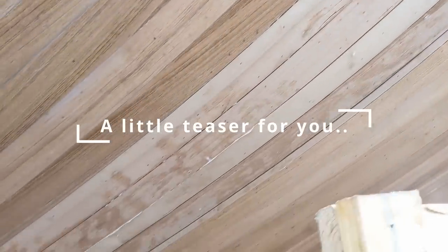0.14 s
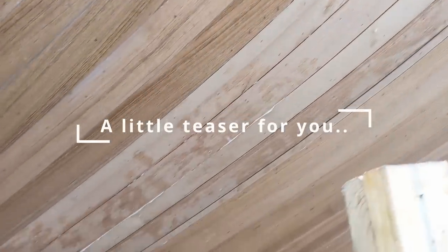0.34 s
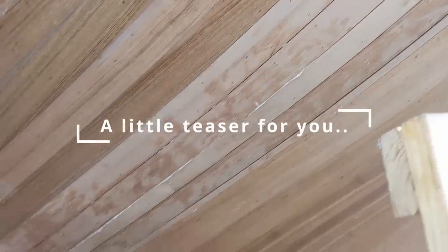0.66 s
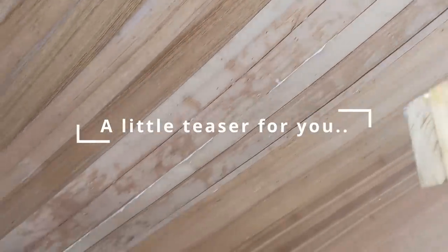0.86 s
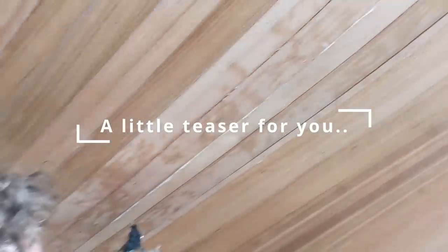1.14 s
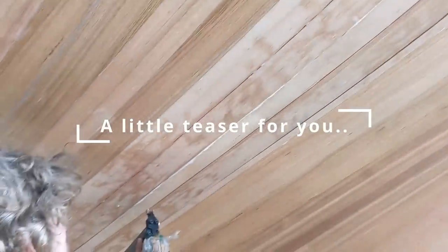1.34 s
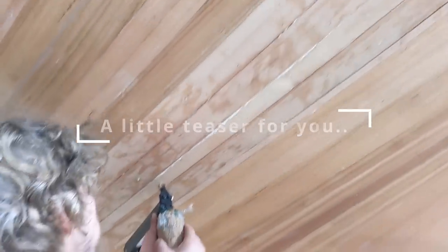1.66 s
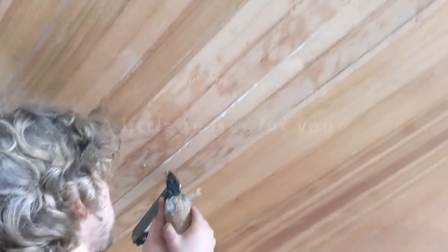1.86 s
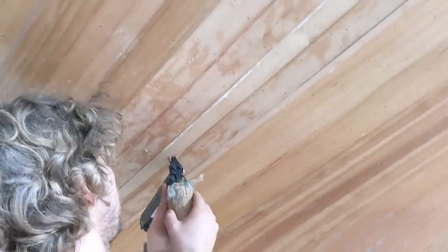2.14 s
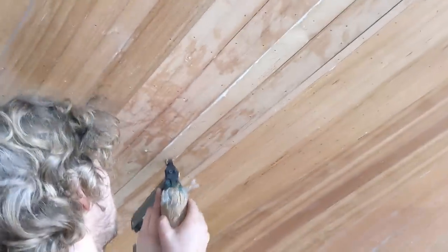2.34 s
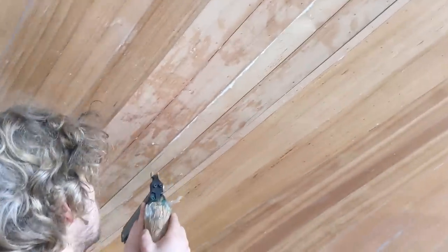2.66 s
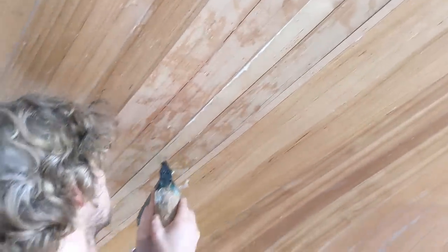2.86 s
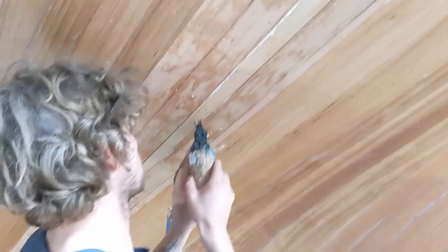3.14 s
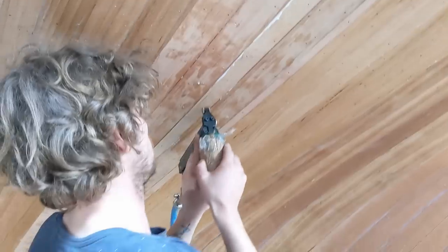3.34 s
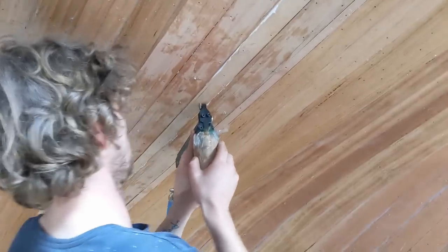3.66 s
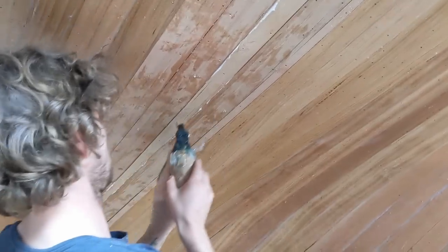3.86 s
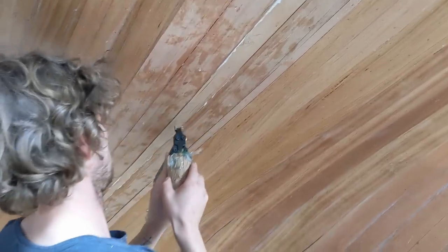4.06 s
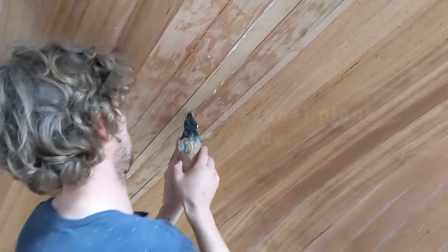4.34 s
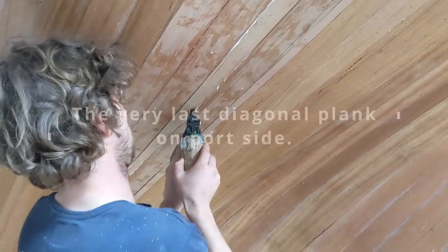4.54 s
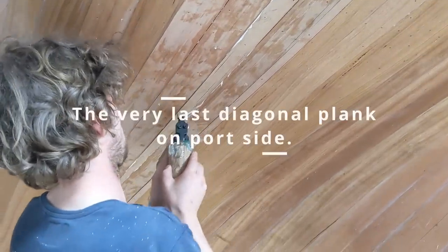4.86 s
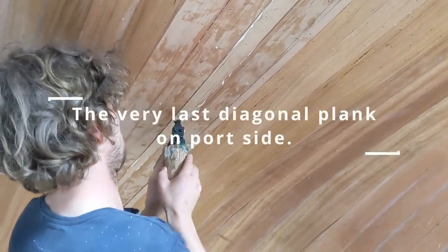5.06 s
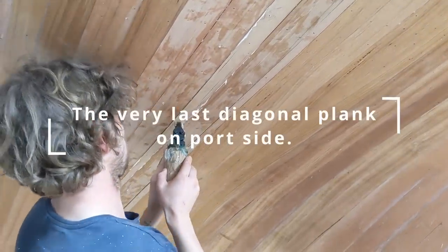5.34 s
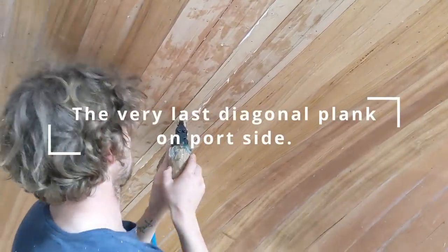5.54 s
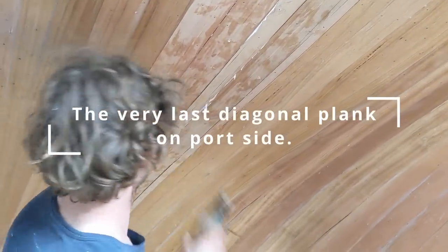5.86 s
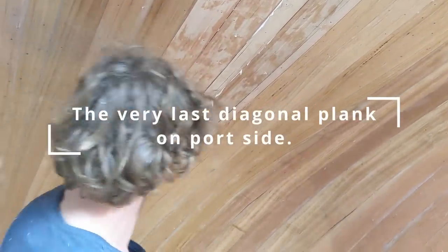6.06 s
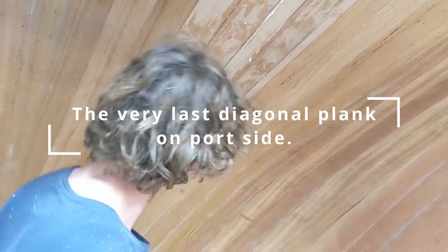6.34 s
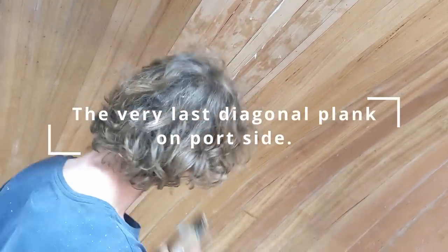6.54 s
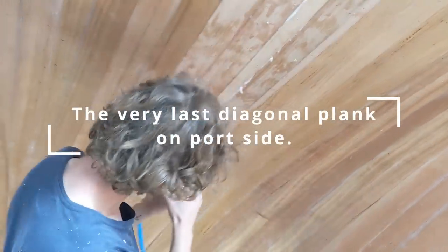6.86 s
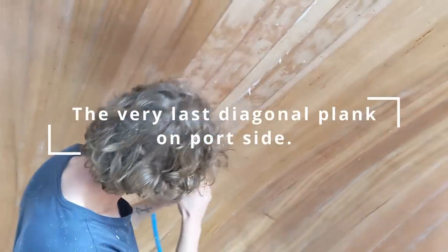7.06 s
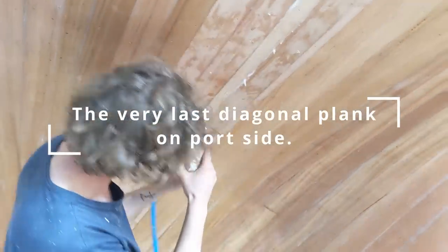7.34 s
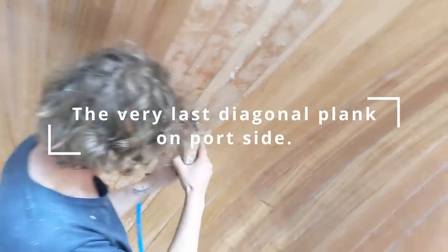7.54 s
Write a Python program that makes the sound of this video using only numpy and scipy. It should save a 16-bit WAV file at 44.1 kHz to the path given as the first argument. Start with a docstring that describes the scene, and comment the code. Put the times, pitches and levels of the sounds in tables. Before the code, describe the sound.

In a quietly humming workshop, small metal clicks, cloth rustle, a sliding hose and gritty shoe scuffs come first. Then a pneumatic nail gun thumps onto hull planks and fires, booming hollowly and venting air. Four more spaced shots follow, with clicks and nose taps between, and a scuffing step before the last. Close stereo microphones; the loud peaks are squashed and the quiet sounds recover after each shot.

```python
"""In a humming workshop, steel parts click, hose and clothes shuffle, gritty shoes scuff and a sole squeaks.
A pneumatic nail gun's nose lands on a planked wooden hull, its trigger clicks, and it fires: five shots in all.
Each shot is a driver blow, a recoil clatter and the boom of the hull; then the piston knocks home and air exhausts.
Blows ring decaying modes; air and friction are coloured noise under envelopes. A footfall rumbles before the last shot."""
import sys
import numpy as np
from scipy import signal
from scipy.fft import rfft, irfft, next_fast_len
from scipy.io import wavfile
from scipy.ndimage import uniform_filter1d, minimum_filter1d

SR = 44100
rng = np.random.default_rng(int(sys.argv[2]) if len(sys.argv) > 2 else 0)


def wav_out(sig):
    """Save sig, one row per channel (or a flat mono array), as 16-bit PCM at SR to the path in sys.argv[1]."""
    wavfile.write(sys.argv[1], SR, np.round(np.clip(np.atleast_2d(sig).T, -1, 1) * 32767).astype(np.int16))


N = 339129
TIME = np.arange(N) / SR

# Table levels are relative unless marked rms; the functions trim them.
# shots: (time [s], blow [dB], recoil [dB], hull boom [dB], hollow ring [dB])
SHOTS = [(2.2225, -2.5, -5.5, 2, -1), (3.5782, -3.5, 1, 2, 7), (4.5017, -6, 9.5, 2.5, 4.5),
         (5.4938, -1, 7.5, 2.5, 10), (7.5100, -4.5, 5.5, 3, 2)]
# trigger releases that vent the cylinder: (time [s], level [dB], length [share of usual], low puff [dB])
VENTS = [(2.3611, 1.5, 0.99, 0), (3.7329, 1.5, 0.93, -1.5), (4.6679, 2, 0.89, -3.5),
         (5.6395, 1.5, 0.95, -7), (7.6588, -1.5, 0.46, -6.5)]
# piston knocking home just before the vent opens: (time [s], knock [dB], first touch [dB])
KNOCKS = [(2.356, -15, -4), (3.715, -7, -14), (4.651, 6.5, 9.5), (5.629, -1, 2.5), (7.645, 6, -27)]
# trigger and safety catch: (time [s], steel ring [dB], woody tap [dB], bright snap [dB])
CLICKS = [(0.034, -34, -69, -47), (1.17, -48, -48, -45), (1.363, -57, -51.5, -48), (1.706, -48, -43, -44),
          (2.067, -50, -71, -58), (2.186, -37, -45, -39), (3.248, -26, -34.5, -27), (3.365, -52, -72, -44),
          (3.442, -34, -69, -33), (3.475, -41, -68, -41), (4.239, -28, -31, -29), (4.417, -45, -52, -41),
          (4.475, -40, -41, -46), (5.301, -28.5, -44, -33), (5.355, -44.5, -70, -42),
          (6.558, -35, -43, -42), (6.897, -35, -41, -41), (6.923, -37, -36.5, -40),
          (7.262, -37, -43.5, -32.5)]
# nose landing on the hull: (time [s], thump [dB], contact low-pass [Hz], steel tip [dB], woody tap [dB],
# bright snap [dB], bounce re first touch [dB])
BUMPS = [(1.841, 5, 556, -32.5, -35, -33.5, 2.5), (3.288, -5, 225, -37.5, -37.5, -36, -7),
         (4.298, -16, 198, -47, -38, -51, -6), (5.4, -5, 173, -33, -32, -37, -6.5),
         (6.38, -46, 303, -50, -46, -54, -8), (7.391, -15, 109, -33.5, -32.5, -30, -3)]
# hull panel modes: (frequency [Hz], level [dB], t60 [s])
HULL_MODES = [(65.3, -19, 1), (88, -4.5, 0.38), (122.9, -2, 0.34), (180.3, -3.5, 0.24), (200, -8, 0.22),
              (222.6, 2, 0.18), (264, -0.5, 0.12), (342, -3.5, 0.083), (410, -1.5, 0.12), (484, -9.5, 0.14),
              (501, -22, 0.18), (648, -14.5, 0.2)]
# plank right under the nose: (frequency [Hz], level [dB], t60 [s])
PLANK_MODES = [(318, -8, 0.014), (670, 1, 0.0074), (1235, -9.5, 0.036), (1570, -6, 0.0076),
               (2510, -17, 0.025)]
# gun steel at size 1, before hand damping: (frequency [Hz], level [dB], t60 [s])
GUN_MODES = [(2364, 10, 0.036), (3500, 9, 0.004), (4300, 5, 0.012), (6200, 6.5, 0.0029),
             (9980, -3.5, 0.014)]
# what the piston sets ringing: (frequency [Hz], level [dB], t60 [s])
PISTON_MODES = [(256, -6.5, 0.048), (380, -1, 0.029), (503, -2.5, 0.0082), (1540, -11.5, 0.033)]
# staging boards under gritty soles: (frequency [Hz], level [dB], t60 [s])
BOARD_MODES = [(338, -3.5, 0.031), (532, -2.5, 0.015), (700, -8, .04), (1053, -1, .025), (1250, 1, 0.022),
               (1770, -3.5, 0.017), (2310, -0.5, 0.019), (2600, -5, 0.012)]
# shoe scuffs: (time [s], level [dB], half length [s])
SCUFFS = [(0.42, -49, 0.019), (0.475, -43.5, 0.011), (0.503, -42, 0.0034), (0.535, -46, 0.014),
          (0.577, -42.5, 0.0098), (0.677, -42, 0.033), (1.016, -44.5, 0.014), (1.041, -38.5, 0.015),
          (5.967, -41, 0.042), (6.091, -26, 0.0051), (6.118, -26.5, 0.017), (7.108, -39.5, 0.013),
          (7.157, -36.5, 0.023)]
# sole squeaks: (time [s], pitch at that time [Hz], level [dB])
SQUEAKS = [(1.003, 454, -26), (1.016, 700, -26.5)]
# movements that rustle the clothes: (time [s], level [dB], half length [s])
RUSTLES = [(.28, -58.5, 0.17), (.37, -46.5, 0.027), (.52, -56.5, 0.18), (.675, -42.5, 0.02),
           (.895, -63, 0.023), (1.025, -46.5, 0.034), (2.18, -58, 0.019), (2.78, -47.5, 0.06),
           (3.05, -65.5, 0.27), (4.35, -66, 0.12), (5.39, -54, 0.067), (6.04, -43, 0.072),
           (6.36, -55, 0.066), (6.59, -56, 0.047), (6.9, -45.5, 0.034), (7.0, -48, 0.061),
           (7.11, -41.5, 0.047)]
# tugs that slide the air hose: (time [s], level [dB], half length [s])
HOSE_TUGS = [(.04, -52, 0.013), (.1, -51.5, 0.038), (.22, -59, 0.024), (.9, -56.5, .025), (2.81, -54, .02),
             (6.65, -53, 0.015)]
# staging rumbling under a footstep: (time [s], level [dB], half length [s])
FOOTFALLS = [(6.14, -55, 0.16)]
# machine hum: (frequency [Hz], level [dB rms])
HUM = [(49, -84.5), (100, -70.5), (201, -72.5), (233, -84)]
# noise spectrum of the hull boom: (frequency [Hz], level per Hz [dB])
BOOM_SPECTRUM = [(50, -87), (110, -59), (200, -10.5), (330, -4), (490, 0), (640, -1.5), (950, -12.5),
                 (1150, -6.5), (1550, -4.5), (2250, -10), (3000, -16.5), (8000, -19.5), (11000, -29),
                 (16000, -34)]
# steel on steel in a shot: (frequency [Hz], level per Hz [dB])
CRACK_SPECTRUM = [(300, 4), (1700, 8), (2400, 2.5), (3200, -5), (6000, -3.5), (9500, -1.5), (15000, -8.5)]
# sharp air jet, also the bright snaps: (frequency [Hz], level per Hz [dB])
JET_SPECTRUM = [(200, -29.5), (900, -25), (2000, -19.5), (4000, -12), (8300, -7), (11000, -13),
                (15500, -15)]
# exhaust hiss: (frequency [Hz], level per Hz [dB])
HISS_SPECTRUM = [(590, -51), (1000, -9.5), (1380, -0.5), (1570, -3.5), (1930, -0.5), (2760, -3.5),
                 (3070, -1), (5150, -3), (6650, 3), (8670, 3.5), (9730, -1), (15100, -10.5), (15800, -12)]
# duller exhaust rush: (frequency [Hz], level per Hz [dB])
RUSH_SPECTRUM = [(45, -15), (95, 7.5), (170, -6.5), (300, -2.5), (520, 6), (720, 1.5), (920, -3.5),
                 (1500, 2), (2500, 1), (4500, -0.5), (7500, -0.5), (10500, -15), (15500, -49)]
# shoe sole friction: (frequency [Hz], level per Hz [dB])
SOLE_SPECTRUM = [(120, -19), (316, -2), (546, -14), (655, 5), (835, -3.5), (1080, -2), (1400, 4.5),
                 (1900, -1), (2300, 2.5), (3800, -6.5), (5460, -1), (15000, -20)]
# cloth friction: (frequency [Hz], level per Hz [dB])
CLOTH_SPECTRUM = [(150, -50), (250, -22), (427, 0.5), (553, -35), (742, -6), (1760, 3), (2240, 4),
                  (2850, -0.5), (6540, 1.5), (15500, -15)]
# hose friction: (frequency [Hz], level per Hz [dB])
RUB_SPECTRUM = [(900, -33), (1450, 6), (2000, 13), (2600, 5), (3400, -16), (9000, -29)]
# woody taps: (frequency [Hz], level per Hz [dB])
WOOD_SPECTRUM = [(150, -3), (500, -4.5), (950, -4), (1400, -2.5), (2200, -4.5), (5000, -22.5)]
# quiet workshop air: (frequency [Hz], level per Hz [dB])
AIR_SPECTRUM = [(42, 8.5), (100, 7), (160, -1.5), (235, 1.5), (280, -6), (450, -6.5), (600, -11),
                (1020, -24), (1400, -7.5), (2200, -9), (4300, -15), (8700, -11.5), (11000, -26.5),
                (15800, -28)]
# footfall rumble: (frequency [Hz], level per Hz [dB])
THUD_SPECTRUM = [(42, -17), (58, 13), (85, -7), (140, -23), (300, -42), (2000, -90)]
# colour difference of the two microphones: (frequency [Hz], left minus right [dB])
BALANCE_DB = [(60, 3.5), (150, 1), (500, 2.5), (1500, -1.5), (4000, -0.5), (8300, -1), (11000, 8),
              (15000, 11.5)]
# likeness of noise at the two microphones: (frequency [Hz], correlation [-1..1])
LIKENESS = [(60, 1), (200, 0.95), (500, 0.81), (900, 0.3), (1400, 0.043), (2500, 0.17), (5000, -0.12),
            (15000, 0.2)]

RECOIL_DELAY_S = 0.0145
TOUCH_LEAD_S, SECOND_TOUCH_SHARE = 0.027, 0.36
STEEL_DAMPED_T60_S = 0.013  # longest ring the hand allows
STEEL_SIZES = (0.94, 0.98, 1.02)
TIP_BOUNCE_S = 0.011
RATTLE_DELAY_S, RATTLE_SPREAD_S, RATTLE_DB = 0.023, 0.05, -50
SQUEAK_HALF_S, SQUEAK_GLIDE_HZ_PER_S = 0.0043, 8700
GRIT_PER_S, GRIT_DB, GRIT_SLOT_SAMPLES = 240, -4, 20
RUSTLE_RISE = 0.66  # cloth catches faster than it lets go
ROOM_T60_S, AIR_FADE_HZ = 0.41, 5830
LIMIT_DB, HOLD_S, RELEASE_DB_PER_S = -7, 0.082, 138
CUTOFF_HZ, CLIP_LEVEL = 16000, 0.56


def shots():
    """The driver punches the plank; the gun recoils and clatters back; the whole hull rings and booms."""
    s, db, recoil_db, boom_db, hollow_db = np.transpose(SHOTS)
    recoil_s = s + RECOIL_DELAY_S
    blow = -strike(s - 0.0003, db, PLANK_MODES, vary_db=2.5)
    rebound = strike(recoil_s, recoil_db - 9.5, PLANK_MODES, vary_db=2.0)
    punch = from_the_gun(lowpass(blow + rebound, hz=3120))

    # steel meets steel at the blow and twice in the recoil
    steel = bursts(s - 0.0008, db - 14, t60_s=0.087)
    steel += bursts(recoil_s - 0.004, db - 18, t60_s=0.035)
    steel += bursts(recoil_s - 0.001, db - 14, t60_s=0.053)

    # the hard recoil favours upper panel modes; above them modes merge into a noisy boom
    click = impulses(recoil_s, boom_db - 27)
    panel = from_the_gun(hull(click - lowpass(click, hz=600), vary_db=0.5))
    boom = blasts(s, boom_db - 22, attack_s=0.0055, swell_db=8.5, swell_s=0.022, hold_s=0.054,
                  release_db_per_s=109) * noise(BOOM_SPECTRUM)
    hollow = blasts(s, hollow_db - 29.5, attack_s=0.015, swell_db=0, swell_s=0.012, hold_s=0.013,
                    release_db_per_s=88.5) * hull_hollow(t60_s=0.029)

    out = hollow * pan(db=-2) + punch * pan(db=2.5)
    out += steel * noise(CRACK_SPECTRUM) * pan(db=5)
    return out + panel * pan(db=-5.5) + boom * pan(db=-3.5)


def hull(force, vary_db=0):
    """The planked panel rings as a sum of decaying modes of alternating sign."""
    out = 0
    for k, (hz, db, t60_s) in enumerate(HULL_MODES):
        gain = from_db(db + vary_db * rng.standard_normal())
        out = out + (-1) ** k * gain * ring(force, hz, t60_s)
    return out


def hull_hollow(t60_s):
    """Air in the hollow of the hull rings at two close pitches when noise drives it; rms 1."""
    drive = noise(BOOM_SPECTRUM)
    return rms_one(ring(drive, 507, t60_s) + from_db(-4) * ring(drive, 423, t60_s))


def piston():
    """The returning piston touches twice at shrinking gaps, then knocks dully through gun and planks."""
    s, db, touch_db = np.transpose(KNOCKS)
    times_s = np.r_[s - TOUCH_LEAD_S, s - TOUCH_LEAD_S * SECOND_TOUCH_SHARE, s]
    levels_db = np.r_[touch_db, (touch_db + db) / 2, db] - 20
    knocks = strike(times_s, levels_db, PISTON_MODES, vary_db=1)
    return workshop(knocks * pan(db=-0.5), wet_db=-0.5)


def exhaust():
    """The valve pops with a low puff and sharp jet; as pressure falls, hiss gives way to a duller rush."""
    s, db, length, puff_db = np.transpose(VENTS)
    puff = lowpass(ring(impulses(s + 0.001, puff_db - 18.5), hz=159, t60_s=0.049), hz=635)
    jet = lowpass(bursts(s, db - 12, t60_s=0.12), hz=203) * noise(JET_SPECTRUM)
    hiss = blasts(s, db - 20.5, attack_s=0.012, swell_db=-10.8, swell_s=0.015, hold_s=0.31,
                  release_db_per_s=294, stretch=length) * noise(HISS_SPECTRUM)
    rush = blasts(s, db - 29, attack_s=0.0028, swell_db=-2.5, swell_s=0.15, hold_s=0.08,
                  release_db_per_s=92, stretch=length) * noise(RUSH_SPECTRUM)
    out = workshop(puff * pan(db=-14), wet_db=-8.5) + jet * pan(db=9.5)
    return out + hiss * pan(db=-4) + rush * pan(db=-1)


def clicks():
    """Hand-damped steel parts of three sizes snap; the tip lands twice, and a loose part ticks after it."""
    tips, rattles = [], []
    for s, _, _, tip_db, tap_db, bright_db, bounce_db in BUMPS:
        for lag_s, change_db in ((0, 0), (TIP_BOUNCE_S, bounce_db)):
            tips.append((s + lag_s, tip_db + change_db, tap_db + change_db, bright_db + change_db))
        rattle_s = s + RATTLE_DELAY_S + RATTLE_SPREAD_S * rng.random()
        rattles.append((rattle_s, RATTLE_DB, RATTLE_DB - 14, RATTLE_DB + 3))
    s, db, wood_db, snap_db = np.transpose(CLICKS + tips + rattles)

    # deal the clicks out in turn to the sizes; larger parts ring lower
    steel = 0
    for k, size in enumerate(STEEL_SIZES):
        turn = slice(k, None, len(STEEL_SIZES))
        modes = [(hz / size, level_db, min(t60_s, STEEL_DAMPED_T60_S)) for hz, level_db, t60_s in GUN_MODES]
        steel = steel + strike(s[turn], db[turn] - 9, modes, vary_db=2)

    snap = lowpass(bursts(s - 0.001, snap_db - 4, t60_s=0.024), hz=301) * noise(JET_SPECTRUM)
    tap = lowpass(bursts(s - 0.001, wood_db, t60_s=0.03), hz=300) * noise(WOOD_SPECTRUM)
    out = workshop(from_the_gun(steel) * pan(db=7), wet_db=-11.5)
    out += workshop(snap * pan(db=0.5), wet_db=-3)
    return out + workshop(tap * pan(db=2), wet_db=-5)


def bumps():
    """The nose lands on the hull; a softer contact wakes only the lowest panel modes."""
    force = sum(lowpass(impulses(np.array([s]), [db - 28.5]), hz) for s, db, hz, *_ in BUMPS)
    return workshop(hull(force) * pan(db=1.5), wet_db=-9)


def shoes():
    """Soles rub, crush grit and squeak on the staging, with room reflections."""
    pressure = strokes(SCUFFS, settle_db=14.5)
    scuffs = from_db(-2) * pressure * rubbing(SOLE_SPECTRUM)
    return workshop(scuffs + grit(pressure) + squeak(), wet_db=-8.5)


def grit(pressure):
    """Grains crushed under a sliding sole knock on the boards, harder the more it presses."""
    slots = np.arange(0, N - 1, GRIT_SLOT_SAMPLES)
    hits = slots[rng.random(len(slots)) < GRIT_PER_S * GRIT_SLOT_SAMPLES / SR]
    pressure_db = 20 * np.log10(pressure[hits] + 1e-9)
    return strike(hits / SR, GRIT_DB + pressure_db, BOARD_MODES, vary_db=3.5)


def squeak():
    """Rubber sticks and slips in short rising chirps with a weak octave."""
    out = 0
    for s, hz, db in SQUEAKS:
        age_s = TIME - s
        phase = 2 * np.pi * (hz + SQUEAK_GLIDE_HZ_PER_S * age_s / 2) * age_s
        tone = np.sin(phase) + 0.25 * np.sin(2 * phase)
        out = out + strokes([(s, db, SQUEAK_HALF_S)], settle_db=31) * tone
    return out


def clothes():
    """Moving cloth rubs in grainy strokes."""
    return from_db(3) * strokes(RUSTLES, settle_db=7, rise=RUSTLE_RISE) * rubbing(CLOTH_SPECTRUM) * pan(db=1)


def hose():
    """The tugged air hose slides with grainy friction."""
    return from_db(3) * strokes(HOSE_TUGS, settle_db=8) * rubbing(RUB_SPECTRUM)


def footfall():
    """The staging rumbles as low noise under a footstep."""
    return strokes(FOOTFALLS, settle_db=6) * noise(THUD_SPECTRUM)


def background():
    """Steady air noise and a machine hum of plain sines."""
    out = from_db(-59.5) * noise(AIR_SPECTRUM) * pan(db=-0.5)
    for hz, rms_db in HUM:
        out = out + np.sqrt(2) * from_db(rms_db) * np.sin(2 * np.pi * (hz * TIME + rng.random()))
    return out


def workshop(x, wet_db):
    """Add diffuse reflections; the treble is absorbed first."""
    t = TIME[:SR]
    scatter = noise([(40, 0), (16000, 0)])[:, :SR]
    dull = lowpass(scatter, AIR_FADE_HZ)
    tail = dull + 0.79 * (scatter - dull) * from_db(-120 * t)
    tail = tail * from_db(-60 * t / ROOM_T60_S) * np.minimum(t / 0.00067, 1)
    response = rms_one(tail) / np.sqrt(SR)
    echo = signal.fftconvolve(x * np.ones((2, 1)), response, axes=1)[:, :N]
    return x + from_db(wet_db) * pan(db=-3.5) * echo


def from_the_gun(x):
    """Direct sound reaches the right microphone 0.33 ms later."""
    return np.array([x, np.interp(TIME - 0.00033, TIME, x)])


def strike(times_s, db, modes, vary_db):
    """Every blow excites each mode with a strength of its own."""
    out = 0
    for k, (hz, level_db, t60_s) in enumerate(modes):
        blow_db = db + level_db + vary_db * rng.standard_normal(len(times_s))
        out = out + (-1) ** k * ring(impulses(times_s, blow_db), hz, t60_s)
    return out


def ring(force, hz, t60_s):
    """Two-pole resonator: a unit click rings a decaying sine of starting height about 1."""
    r, w = from_db(-60 / (t60_s * SR)), 2 * np.pi * hz / SR
    return signal.lfilter([0, np.sin(w)], [1, -2 * r * np.cos(w), r * r], force + 1e-18)


def impulses(times_s, db):
    """One single-sample click at each time."""
    out = np.zeros(N)
    out[np.round(times_s * SR).astype(int)] = from_db(db)
    return out


def bursts(times_s, db, t60_s):
    """Envelope that jumps up at each time and dies away exponentially."""
    return signal.lfilter([1], [1, -from_db(-60 / (t60_s * SR))], impulses(times_s, db) + 1e-18)


def blasts(times_s, db, attack_s, swell_db, swell_s, hold_s, release_db_per_s, stretch=1):
    """Blasts open fast, swell (or sink if swell_db < 0), linger, then fall; stretch scales their time."""
    out = 0
    for s, peak_db, length in np.broadcast(times_s, db, stretch):
        age = np.clip((TIME - s) / length, 0, 2)
        rise_db = swell_db * np.minimum(age / swell_s - 1, 0)
        fall_db = release_db_per_s * (np.hypot(np.maximum(age - swell_s, 0), hold_s) - hold_s)
        out = out + np.minimum(age / attack_s, 1) ** 2 * from_db(peak_db + rise_db - fall_db)
    return out


def strokes(rows, settle_db, rise=1):
    """Movements swell like a bell curve (rise scales its width), then tend to settle_db per half length."""
    level = 0
    for s, db, half_s in rows:
        u = np.clip((TIME - s) / half_s, -20, 20)
        swell = np.exp(-np.maximum(u / rise, -10) ** 2 / 2)
        settle = from_db(settle_db * (1 - np.hypot(1, u)))
        level = level + from_db(db) * np.where(u < 0, swell, settle)
    return level


def rubbing(spectrum):
    """Friction catches and slips: lows, mids and highs each come in grains of their own; rms 1."""
    hiss = noise(spectrum)
    low, below_treble = lowpass(hiss, hz=800), lowpass(hiss, hz=3000)
    bands = (low, below_treble - low, hiss - below_treble)
    out = 0
    for band, grain_hz in zip(bands, (80, 130, 220)):
        flicker_db = 2.6 * rms_one(lowpass(rng.standard_normal(N), grain_hz))
        out = out + band * from_db(flicker_db)
    return rms_one(out)


def noise(spectrum):
    """Stereo noise of a given colour, its channels correlated as in LIKENESS; rms 1."""
    size = next_fast_len(N)
    hz = np.fft.rfftfreq(size, 1 / SR)
    mid, side = rfft(rng.standard_normal((2, size)))
    alike = np.clip(at_hz(LIKENESS, hz), -1, 1)
    bass_cut = np.minimum(hz / spectrum[0][0], 1) ** 2
    gain = from_db(at_hz(spectrum, hz)) * bass_cut * (hz < CUTOFF_HZ)
    stereo = np.sqrt(1 + alike) * mid + np.sqrt(1 - alike) * side * [[1], [-1]]
    return rms_one(irfft(gain * stereo, size)[:, :N])


def lowpass(x, hz):
    """Gentle causal second-order low-pass."""
    return signal.sosfilt(signal.butter(2, min(hz, 0.45 * SR), fs=SR, output="sos"), x + 1e-18)


def at_hz(points, hz):
    """Read a table along log frequency."""
    f, value = np.transpose(points)
    return np.interp(np.log(hz + 0.0009), np.log(f), value)


def pan(db):
    """Left and right gains for a level difference."""
    return from_db([[db / 2], [-db / 2]])


def rms_one(x):
    """Scale to rms 1."""
    return x / np.sqrt(np.mean(x ** 2) + 1e-20)


def from_db(db):
    """Decibels to amplitude gain."""
    return 10 ** (np.asarray(db) / 20)


def limiter(x):
    """Each channel is turned down at once by a peak, held there, then let up at a steady rate."""
    over_db = np.maximum(20 * np.log10(np.abs(x) + 1e-9) - LIMIT_DB, 0)
    half = int(HOLD_S * SR / 2)
    held_db = -minimum_filter1d(-over_db, 2 * half + 1, origin=half, axis=1)
    release_db = RELEASE_DB_PER_S * TIME
    cut_db = np.maximum.accumulate(held_db + release_db, axis=1) - release_db
    return x * from_db(-uniform_filter1d(cut_db, size=40, axis=1))


def scene():
    """The gun and its user over the quiet air and hum of the workshop."""
    gun = shots() + piston() + exhaust() + clicks() + bumps()
    user = shoes() + clothes() + hose() + footfall()
    return gun + user + background()


def record(dry):
    """Two microphones of unlike colour; deep bass is cut, peaks are limited and clipped, the top is cut."""
    size = next_fast_len(N + SR)
    tilt_db = at_hz(BALANCE_DB, np.fft.rfftfreq(size, 1 / SR))
    heard = irfft(rfft(dry, size) * from_db([tilt_db / 2, -tilt_db / 2]), size)[:, :N]
    heard = signal.sosfilt(signal.butter(4, 42, "high", fs=SR, output="sos"), heard)
    clipped = np.clip(limiter(heard), -CLIP_LEVEL, CLIP_LEVEL)
    return signal.sosfilt(signal.ellip(10, 0.2, 70, CUTOFF_HZ, fs=SR, output="sos"), clipped)


dry = scene()
out = record(dry)
wav_out(out)
```